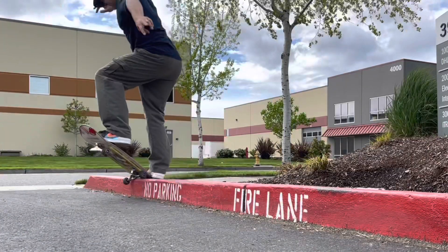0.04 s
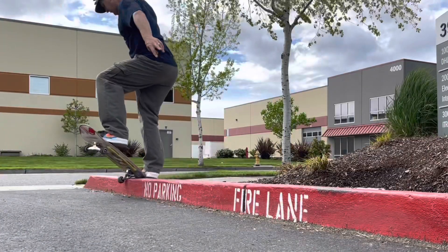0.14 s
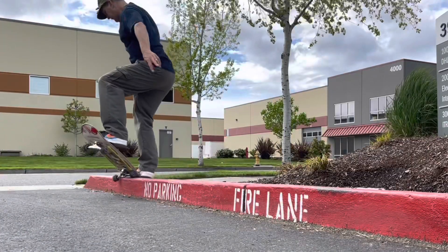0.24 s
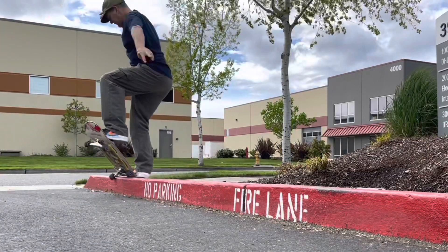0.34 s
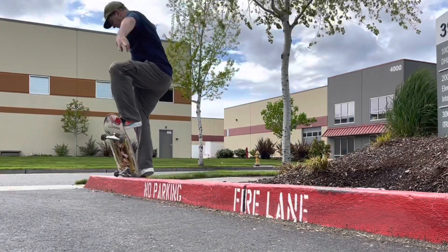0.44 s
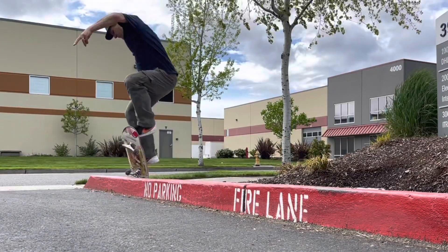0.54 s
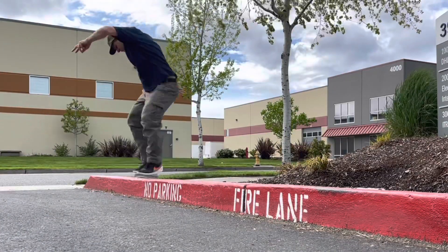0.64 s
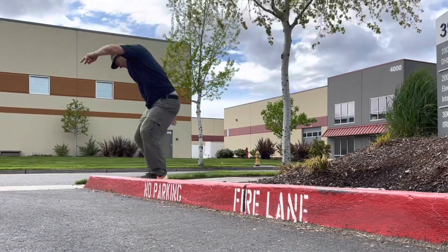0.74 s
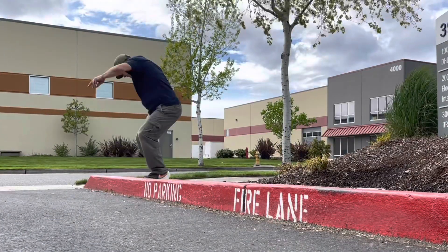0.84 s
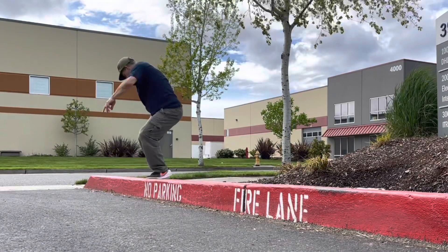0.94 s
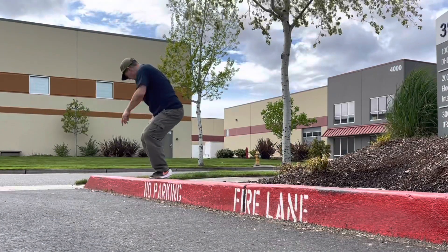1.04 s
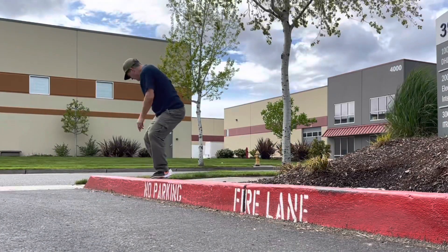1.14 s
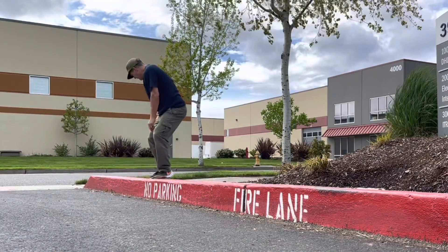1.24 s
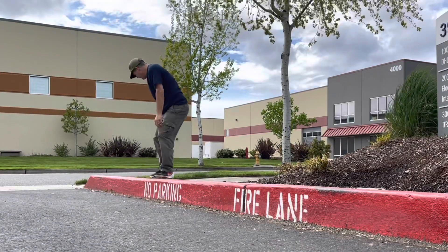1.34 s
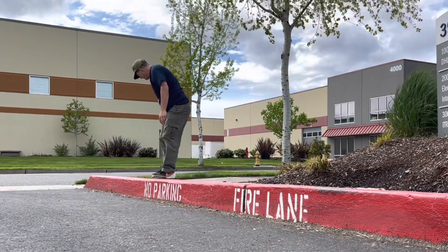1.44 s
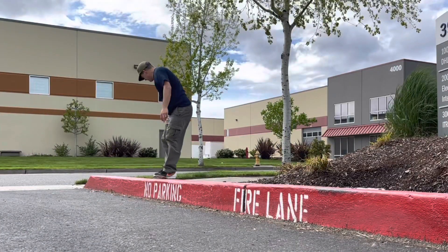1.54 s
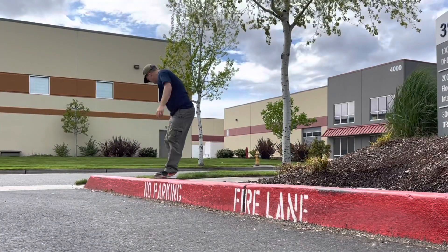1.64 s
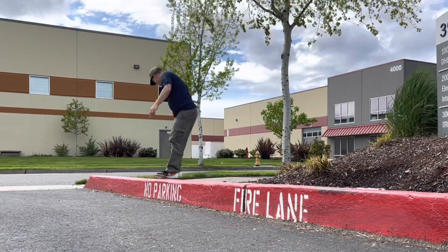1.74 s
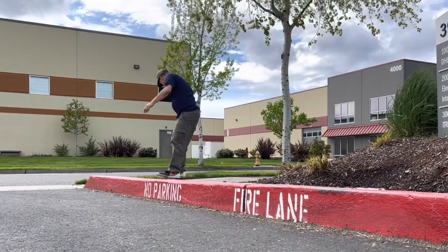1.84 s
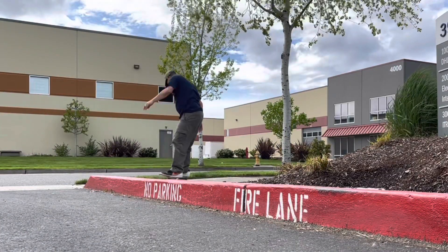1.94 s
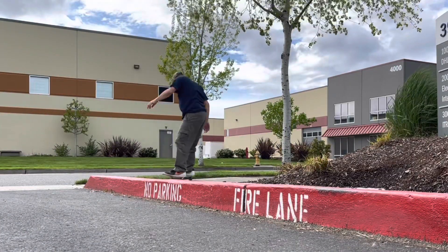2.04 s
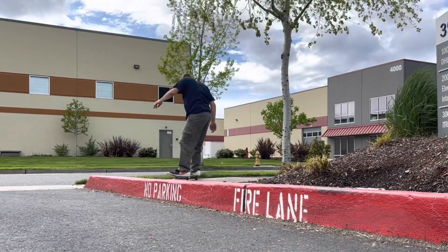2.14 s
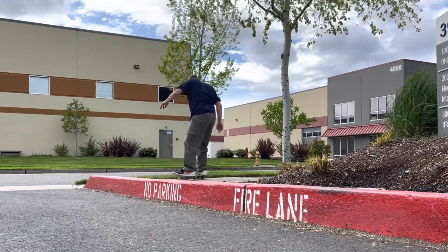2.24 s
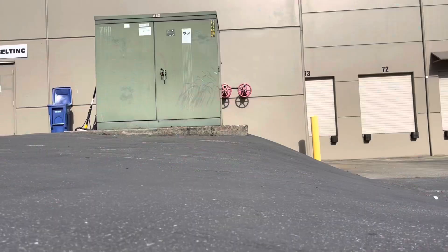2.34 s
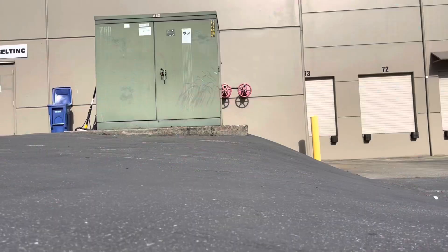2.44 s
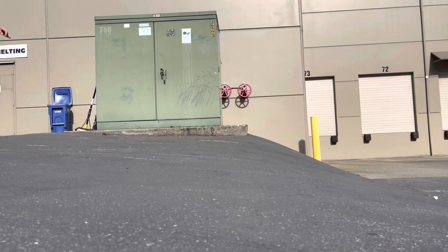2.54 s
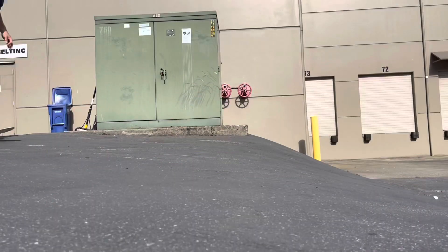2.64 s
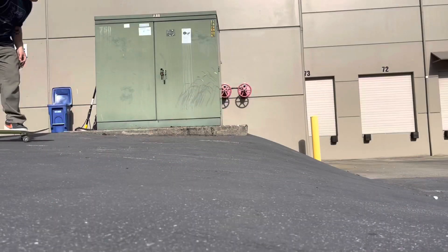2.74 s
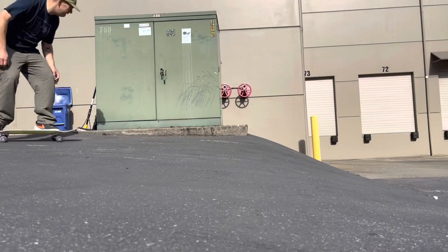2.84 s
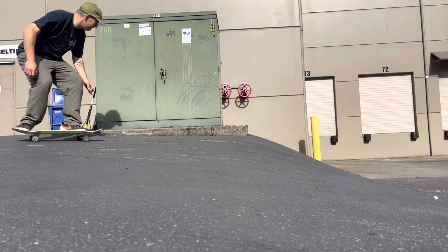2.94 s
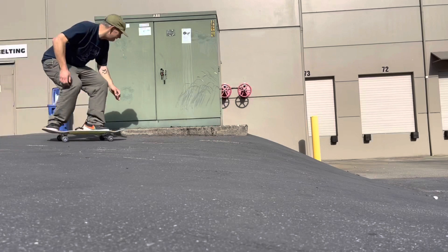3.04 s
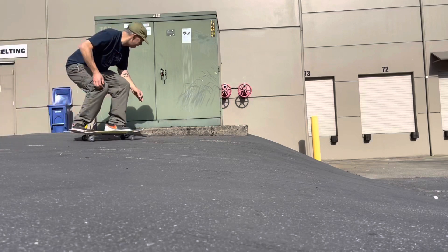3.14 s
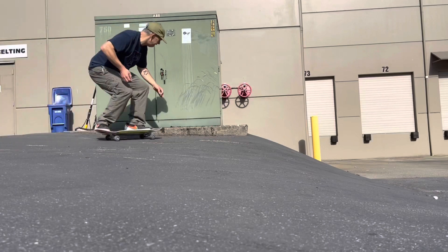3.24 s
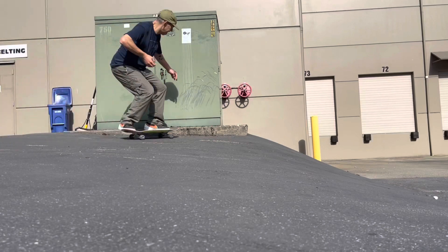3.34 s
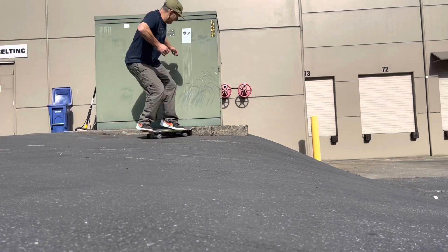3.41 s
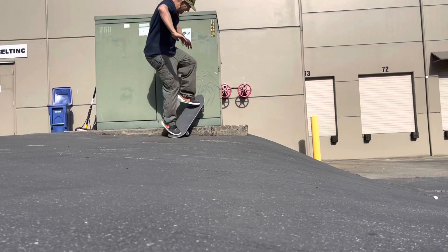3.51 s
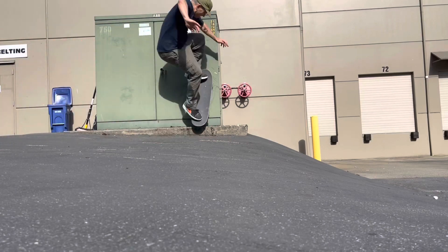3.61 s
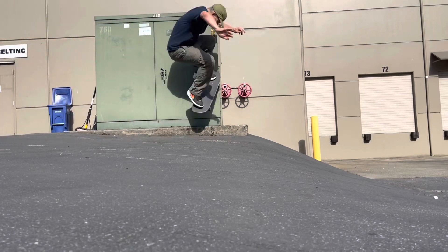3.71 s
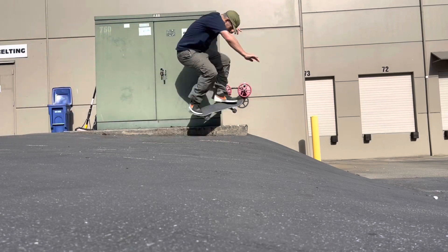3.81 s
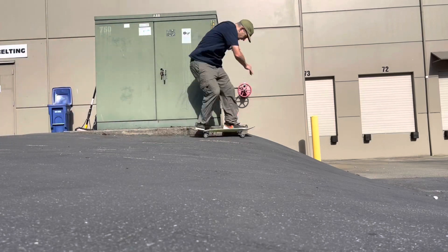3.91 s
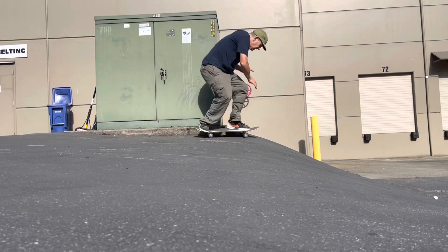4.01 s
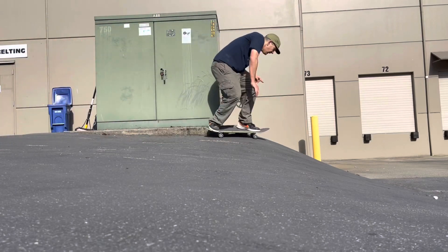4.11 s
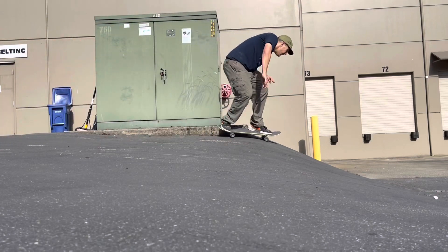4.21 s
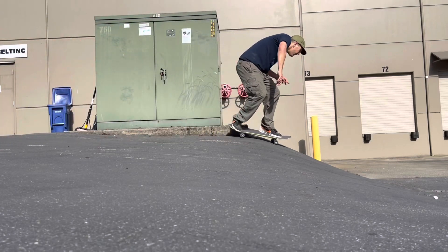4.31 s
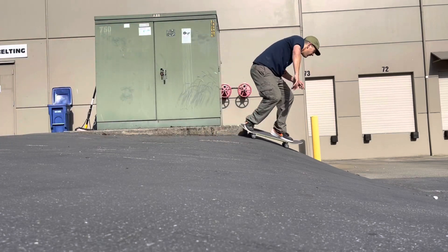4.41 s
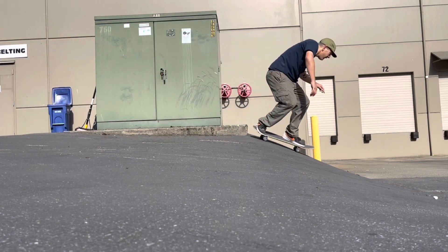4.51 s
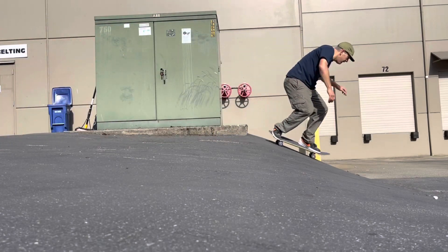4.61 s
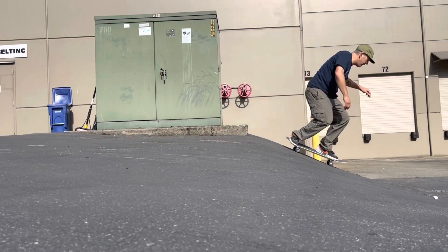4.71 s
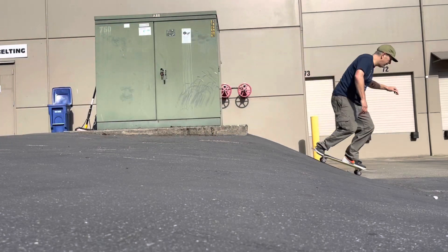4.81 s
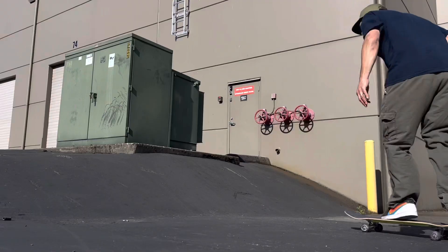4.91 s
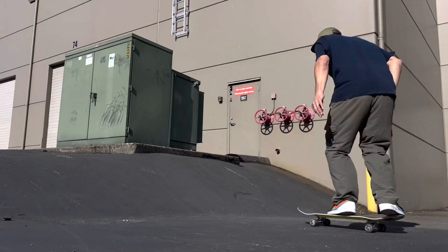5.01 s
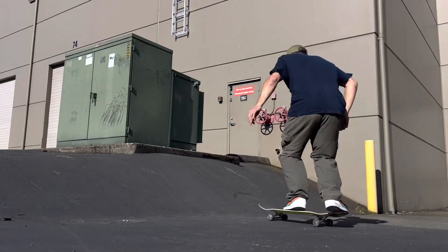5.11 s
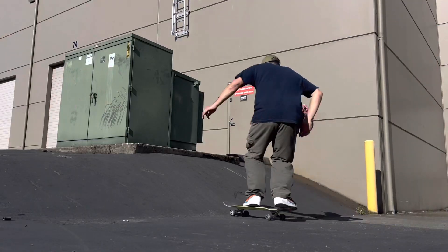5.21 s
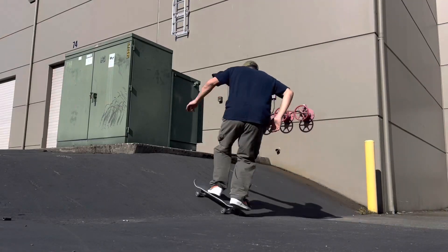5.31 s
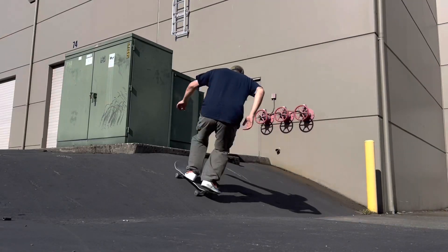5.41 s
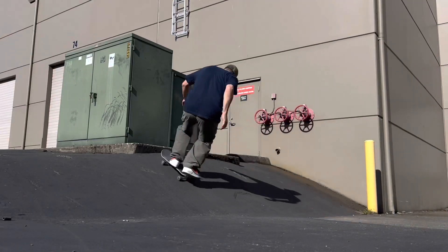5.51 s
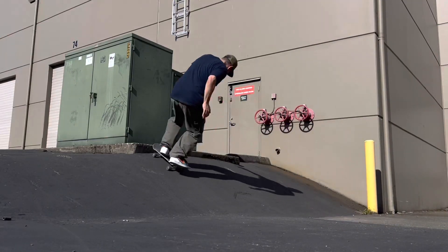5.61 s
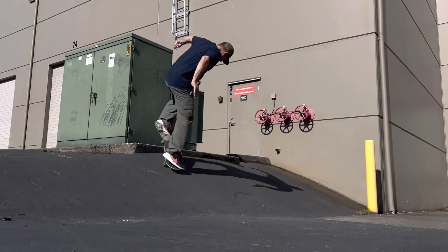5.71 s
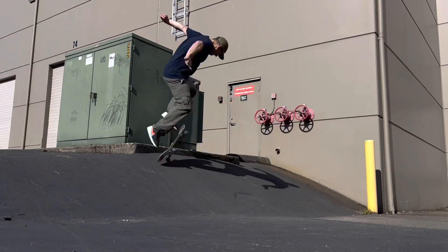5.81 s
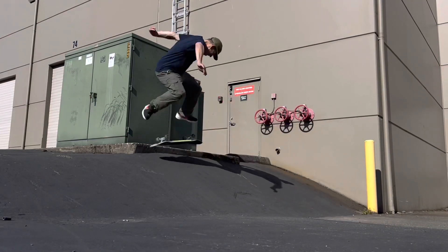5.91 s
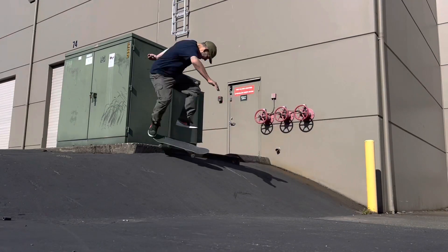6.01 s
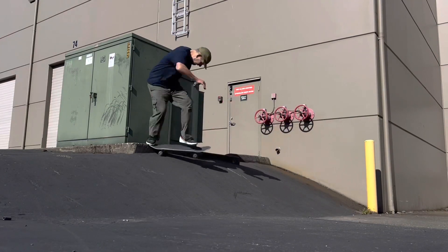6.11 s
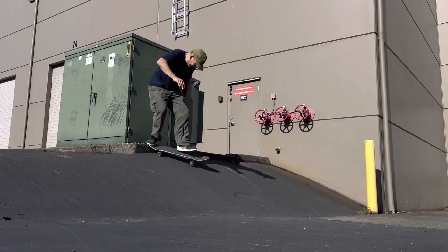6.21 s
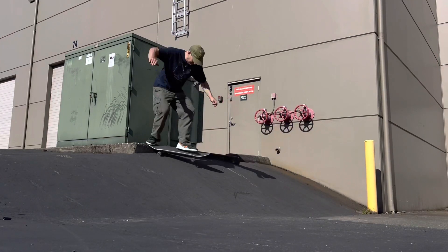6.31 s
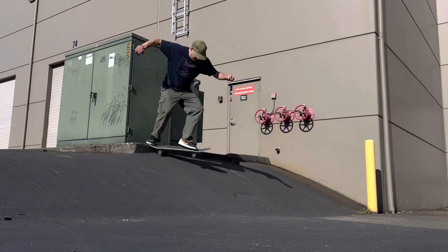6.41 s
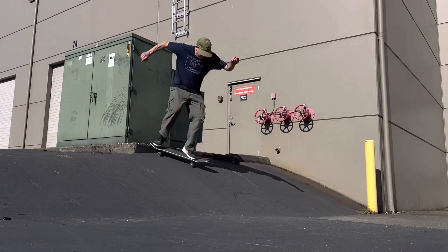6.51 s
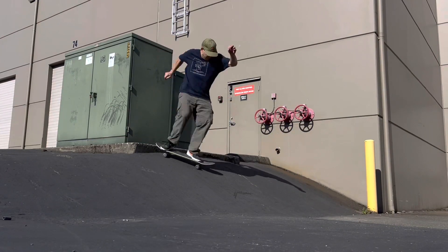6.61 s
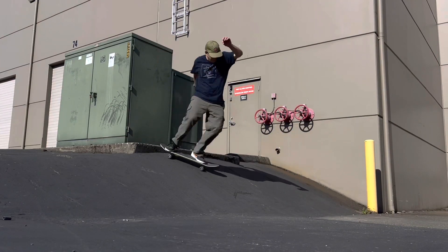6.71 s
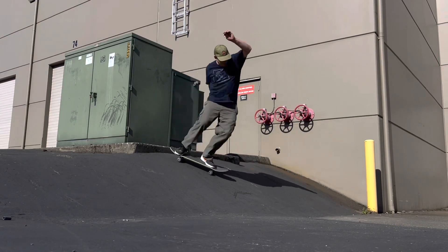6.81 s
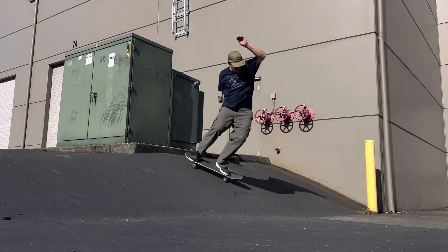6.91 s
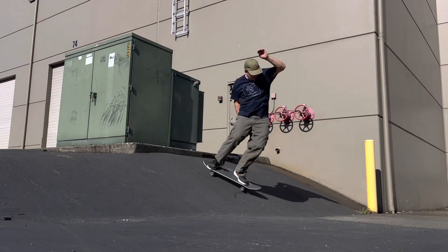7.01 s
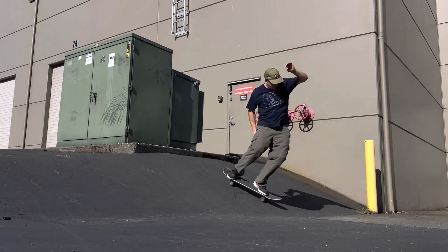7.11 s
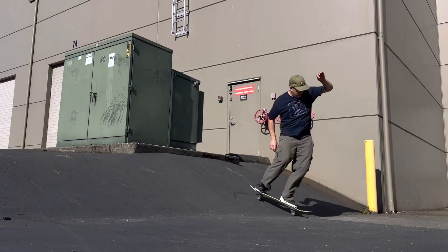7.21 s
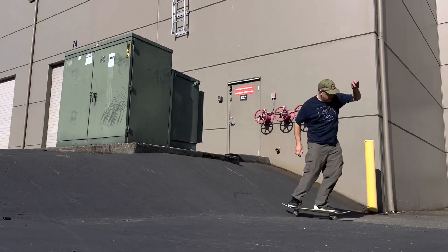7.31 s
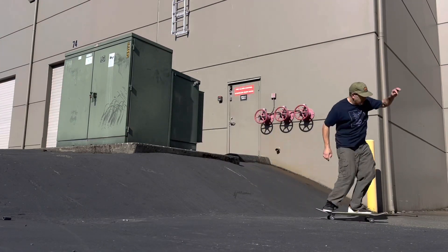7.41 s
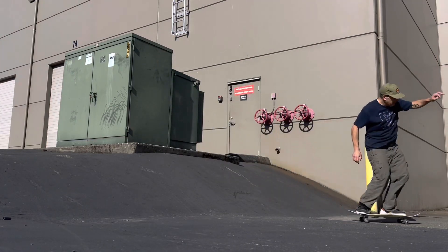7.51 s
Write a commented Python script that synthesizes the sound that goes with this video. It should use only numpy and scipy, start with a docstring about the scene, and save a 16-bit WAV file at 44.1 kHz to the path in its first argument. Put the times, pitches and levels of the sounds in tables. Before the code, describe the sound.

Hard wheels roar and whirr over rough ground, making the wooden deck drone. One solid knock gives way to a quiet stretch of wind rumble and small scuffs. Then come rolling, clustered cracks and thumps, a loud landing, gritty scrubbing, another pop and slap, wind thuds and clattering wheels. Outdoors, close, fairly dry, with short reflections from nearby walls.

```python
"""A skateboarder does three tricks in an open concrete and asphalt lot, close to a two-port microphone.
From the start hard wheels rattle over coarse ground: impacts make the deck drone and the trucks whirr.
A first pop and landing follow, then shoes scuff on the resting board while wind rumbles and buffets the ports.
The wheels return, with a quick cluster of slams, scrubs and low thumps, then one more pop and landing;
pops and slaps are short noise contacts that ring the board. The hush of the lot lies under everything."""
import sys
import numpy as np
from scipy import signal
from scipy.fft import rfft, irfft, next_fast_len
from scipy.io import wavfile

SR = 44100
rng = np.random.default_rng(int(sys.argv[2]) if len(sys.argv) > 2 else 0)


def put_to_file(sound):
    """Save the sound as 16-bit audio at rate SR, in the file named by the first command-line argument."""
    columns = np.atleast_2d(sound).T  # one column per channel
    safe = np.clip(columns, -1, 1)
    whole_steps = np.round(safe * 32767)
    wavfile.write(sys.argv[1], SR, whole_steps.astype(np.int16))


N = 332955
TIME = np.arange(N) / SR

# ringing of deck and trucks: (frequency [Hz], level [dB], t60 [s])
BOARD_MODES = [(426, -6.5, 0.12), (774, -3.5, 0.023), (1079, -8.5, 0.061), (1570, -0.5, 0.035),
               (1874, 4, 0.019)]


def from_db(db):
    """Decibels to gain."""
    return 10 ** (np.asarray(db) / 20)


def rms_one(x):
    """Scale to unit power."""
    return x / np.sqrt(np.mean(x ** 2) + 1e-20)


def in_time(rows):
    """Each column of a curve table, sample by sample."""
    s, *columns = np.transpose(rows)
    return [np.interp(TIME, s, column) for column in columns]


def band(x, low_hz, high_hz, order=3):
    """Butterworth band-pass."""
    edges_hz = [low_hz, min(high_hz, .45 * SR)]
    return signal.sosfilt(signal.butter(order, edges_hz, "band", fs=SR, output="sos"), x)


def colour(x, spectrum):
    """Causal (minimum-phase) filter with the given spectrum."""
    size = 8192
    hz, db = np.transpose(spectrum)
    grid_hz = np.linspace(1, SR / 2, size // 2 + 1)
    gain = from_db(np.interp(np.log(grid_hz), np.log(hz), db))
    cepstrum = irfft(np.log(gain))
    # doubling the causal half of the cepstrum gives minimum phase
    response = irfft(np.exp(rfft(2 * cepstrum[:size // 2], size) - cepstrum[0]))
    return signal.fftconvolve(x, response)[:len(x)]


def drift(rate_hz):
    """Slow chance with spread 1: low-passed noise."""
    slow = signal.butter(2, rate_hz, fs=SR, output="sos")
    return rms_one(signal.sosfilt(slow, rng.standard_normal(N)))


def swell(s, rise_s, fall_s):
    """A smooth rise to 1 at time s and a fall back towards 0; it is down to 1/e at either given time."""
    away = np.maximum((s - TIME) / rise_s, (TIME - s) / fall_s)
    return np.exp(-np.minimum(away, 10) ** 1.68)   # exponent 1 is a pointed swell, 2 a round one


def power(levels_db, envelope):
    """Power of several layers that share one envelope."""
    return np.outer(from_db(levels_db) ** 2, envelope ** 2)


def wheel_gains(scrub_db):
    """Gains of roar, whirr, grit and thrum: stretches of wheel noise, with scrubs and scuffs added in power."""
    # stretches of wheel noise, on the ground or spinning on in the air, growing or fading:
    # (start [s], end [s], roar at start [dB], roar at end [dB], whirr against roar [dB],
    # grit against roar [dB], low thrum [dB])
    stretches = [(-0.05, 0.437, -28, -37, -8.5, -15.5, -45), (2.402, 3.525, -38, -28.5, -11, -14, -29.5),
                 (3.62, 3.906, -27.5, -26.5, -11.5, -19.5, -26.5),
                 (4.058, 4.934, -31.5, -37, -10.5, -18, -34.5),
                 (4.965, 5.666, -23.5, -26.5, -9.5, -18.5, -33), (5.735, 6.002, -33.5, -50, -7.5, -18, -59),
                 (6.17, 6.833, -31.5, -37, -4, -19, -55), (6.868, 7.598, -31, -27.5, -8.5, -17, -38)]
    # wheels and tail bite harder into the ground and scrub, levels before scrub_db is added:
    # (time [s], rise [s], fall [s], roar [dB], whirr [dB], grit [dB])
    scrubs = [(0.255, 0.033, 0.065, -23, -35, -39.5), (0.51, 0.056, 0.028, -26.5, -34, -36),
              (2.7, 0.3, 0.29, -27, -42, -40.5), (3.515, 0.057, 0.053, -16.5, -26, -34),
              (3.571, 0.032, 0.11, -17, -23, -34.5), (4.19, 0.049, 0.077, -28, -38.5, -43.5),
              (4.893, 0.045, 0.13, -21.5, -27.5, -52), (5.076, 0.16, 0.085, -22, -27, -29.5),
              (5.359, 0.14, 0.11, -17, -26, -28.5), (5.687, 0.027, 0.012, -43, -27.5, -40.5),
              (5.778, 0.027, 0.045, -29.5, -38, -40), (6.472, 0.12, 0.068, -21.5, -36.5, -71),
              (7.27, 0.26, 0.24, -52, -29, -36.5)]
    # shoes scuff on the board at rest: (time [s], level before colouring [dB])
    scuffs = [(0.82, -48.5), (0.889, -44), (1.092, -55), (1.254, -49), (2.21, -49)]
    # colouring of the scuffs: (roar [dB], whirr [dB], grit [dB])
    scuff_colour_db = (9, -3.5, -7.5)
    attack_s, release_s, scuff_half_s = 0.069, 0.017, 0.022
    total, thrum = 0, 0
    for start, end, start_db, end_db, whirr_db, grit_db, thrum_db in stretches:
        outside = np.maximum((start - TIME) / attack_s, (TIME - end) / release_s)
        turning = np.exp(-np.clip(outside, 0, 10) ** 2)
        roar_db = np.interp(TIME, [start, end], [start_db, end_db])
        total += power([0, whirr_db, grit_db], turning * from_db(roar_db))
        thrum += (from_db(thrum_db) * turning) ** 2
    for s, rise_s, fall_s, *levels_db in scrubs:
        total += power(levels_db, from_db(scrub_db) * swell(s, rise_s, fall_s))
    scuffing = sum(from_db(db) * swell(s, scuff_half_s, scuff_half_s) for s, db in scuffs)
    total += power(scuff_colour_db, scuffing)
    return np.sqrt(total), np.sqrt(thrum)


def pebbles(per_s, spread_db):
    """Wheels strike stones of many sizes at random moments."""
    sizes = from_db(spread_db * np.minimum(rng.exponential(1, N), np.pi)) * rng.choice([-1, 1], N)
    return rms_one(sizes * (rng.random(N) < per_s / SR))


def flex(x, depth, width_hz, rate_hz):
    """As the contact point shifts, each mode of the board comes forward and recedes at random."""
    modes = (drift(rate_hz) * band(x, hz - width_hz, hz + width_hz, order=1) for hz, _, _ in BOARD_MODES)
    return x + depth * sum(modes)


def wall_echo(x):
    """A near wall returns the sound; its delay wanders, so a comb of peaks slides through the wheel noise."""
    delay_s = 0.007 + 0.000387 * drift(1)
    return x + from_db(-15.5) * np.interp(TIME - delay_s, TIME, x)


def crunches(per_s, length_s, depth):
    """Now and then a loose stone is crushed under a wheel and the noise flares for a few ms."""
    stones = (rng.random(N) < per_s / SR) * rng.random(N)
    return 1 + depth * signal.fftconvolve(stones, np.hanning(int(length_s * SR)), "same")


def resonate(x, hz, width_hz, share):
    """Blend x into its own ringing at a gliding resonance, holding the power about even."""
    turn = np.exp(2j * np.pi * np.cumsum(hz) / SR)
    r = np.exp(-np.pi * width_hz / SR)
    # shift the resonance down to 0 Hz, low-pass, and shift back up
    ringing = rms_one((signal.lfilter([1 - r], [1, -r], x / turn) * turn).real)
    share = np.clip(share, 0, 1)
    overlap = 2 * np.mean(x * ringing) * share * (1 - share)
    return ((1 - share) * x + share * ringing) / np.sqrt((1 - share) ** 2 + share ** 2 + overlap)


def wheel_noise(gains):
    """One stream of random impacts shakes the deck, rattles the trucks and hisses at the wheels."""
    # resonance of the deck: (time [s], frequency [Hz], share of the roar [0-1])
    drone = [(.45, 853, 0.41), (2.4, 418, 0.58), (2.85, 472, 0.7), (3.5, 470, 0), (5.15, 455, 0.32),
             (5.385, 574, 1), (5.46, 553, 0.23)]
    # balance of sizzle above 7.5 kHz against hiss: (time [s], level [dB])
    sizzle_balance = [(0.5, -1), (0.85, -18), (3.42, 0), (3.65, -26), (5.05, 0.5), (6.4, -14), (7.25, -4.5)]
    # spectrum of the shaken board: (frequency [Hz], relative level per Hz [dB])
    roll_spectrum = [(500, 5.5), (950, 1.5), (1300, -7.5), (1850, -17.5), (2400, -19), (3200, -29),
                     (7000, -33.5), (9500, -19), (12300, -28), (13900, -51)]
    roar_gain, whirr_gain, grit_gain = gains
    deck_hz, deck_share = in_time(drone)
    sizzle_gain = from_db(in_time(sizzle_balance)[0])
    road = pebbles(per_s=4000, spread_db=4.5) * from_db(1.12 * drift(34.0))
    board = flex(colour(road, roll_spectrum), depth=0.66, width_hz=64, rate_hz=8.9)
    shaken = wall_echo(board)
    crunch = crunches(per_s=50, length_s=0.0089, depth=1.68)   # flares in whirr and grit, not in the roar
    roar = resonate(rms_one(band(shaken, 242, 1440)), deck_hz, 87, deck_share)
    rattling = rms_one(band(shaken, 1387, 3060) * np.sqrt(crunch))
    whirr = resonate(rattling, np.full(N, 1756), width_hz=370, share=0.29)   # resonance of the trucks
    hiss = rms_one(band(shaken, 2800, 7500))
    sizzle = rms_one(band(shaken, 7500, SR))
    grit = rms_one(crunch * (hiss + sizzle_gain * sizzle) / np.hypot(1, sizzle_gain))
    return roar * roar_gain + whirr * whirr_gain + grit * grit_gain


def off_axis(x):
    """With the board to the left, the treble around 3-5.5 kHz gains in the left port and fades in the right."""
    # how far the board is to the left of the microphone: (time [s], share [0-1])
    leftward = [(2.4, 0.44), (3.55, 0.34), (3.9, 0.12)]
    hz = np.fft.rfftfreq(N, 1 / SR)
    shaded = irfft(rfft(x) * np.interp(hz, [500, 3000, 5500, 8000], [0, 1, 1, 0]), N)
    return x + in_time(leftward)[0] * shaded * np.array([[1], [-1]])


def rumble_gains():
    """Gains of deep and upper rumble: swells over a steady breeze, and the swell part the ports do not share."""
    # swells of low noise: wind gusts, and low thumps that both ports share:
    # (time [s], half length [s], deep [dB], upper [dB], port difference against the swell [dB])
    low_swells = [(0.47, 0.046, -25, -31, -14), (1.163, 1, -32.5, -47, -7),
                  (1.843, 0.16, -20.5, -32, -11.5), (2.17, 0.076, -36.5, -23, -12.5),
                  (3.605, 0.086, -21, -20, -50), (4.25, 0.46, -29, -33.5, -26),
                  (5.05, 0.14, -19.5, -19.5, -14), (5.51, 0.38, -27, -27.5, -2),
                  (6.443, 0.18, -25.5, -24.5, -5.5), (6.933, 0.13, -23.5, -21, -5),
                  (7.495, 0.13, -31, -28.5, -2.5)]
    # breeze between swells: (deep [dB], upper [dB])
    breeze_db = (-40.5, -43.5)
    shared, apart = power(breeze_db, np.ones(N)), 0
    for s, half_s, deep_db, upper_db, apart_db in low_swells:
        low_swell = power([deep_db, upper_db], swell(s, half_s, half_s))
        shared = shared + low_swell
        apart = apart + low_swell * from_db(apart_db) ** 2
    return np.sqrt(shared), np.sqrt(apart)


def rumble(gains):
    """Lumpy, fluttering low noise in two bands, for wind on the ports, low thumps and the thrum of the wheels."""
    # spectrum of the rumble: (frequency [Hz], relative level per Hz [dB])
    rumble_spectrum = [(25, -25.5), (58, 6), (130, 1), (350, -8.5)]
    deep_gain, upper_gain = gains
    flutter = from_db(2.4 * drift(18.0))
    low_noise = colour(rng.standard_normal(N), rumble_spectrum) * flutter
    deep = rms_one(band(low_noise, 24, 120)) * deep_gain
    upper = rms_one(band(low_noise, 122.5, 299)) * upper_gain
    return deep + upper


def air():
    """Far, even hush of the open lot, partly shared by the ports."""
    # spectrum of the hush: (frequency [Hz], relative level per Hz [dB])
    air_spectrum = [(650, 1.5), (1800, -12.5), (2500, -23.5), (9300, -30.5), (11000, -42)]
    shared, left, right = (band(colour(rng.standard_normal(N), air_spectrum), 200, SR / 2, order=2)
                           for _ in range(3))
    return from_db(-49) * rms_one(shared + .5 * np.array([left, right]))


def contacts():
    """Every blow as (s, knock dB, centre Hz, crack dB, sizzle dB, contact s); rattles are uneven runs."""
    # pops and landings: (time [s], knock [dB], knock centre [Hz], crack [dB],
    # sizzle against crack [dB], contact [s])
    slams = [(0.6975, -7.5, 630, -31, -5, 0.019), (3.505, -15.5, 1030, -38, 8, 0.026),
             (3.532, -11.5, 1250, -17, -25, 0.0098), (3.9075, -5.5, 590, -16.5, -1, 0.0066),
             (6.0758, -8.5, 1780, -18.5, -3.5, 0.0043), (6.544, -8, 1150, -21, 19, 0.0065)]
    # single knocks of wheels and deck: (time [s], knock [dB], knock centre [Hz], crack [dB])
    knocks = [(0.26, -19.5, 680, -38), (0.523, -21.5, 890, -53), (0.709, -9.5, 227, -27),
              (0.7225, -11.5, 810, -29), (0.874, -47, 585, -61), (1.847, -42.5, 1190, -52),
              (2.905, -31, 900, -36), (2.987, -25.5, 650, -36), (3.455, -18, 900, -22.5),
              (3.4896, -12.5, 890, -20), (3.5536, -7, 514, -30), (3.5641, -11, 840, -25),
              (3.729, -17, 710, -27.5), (3.94, -19, 780, -38), (4.499, -28.5, 1120, -35.5),
              (5.586, -15, 393, -57), (5.77, -23, 676, -48), (6.046, -22.5, 790, -33.5),
              (6.0751, -12.5, 630, -31), (6.099, -15.5, 447, -38), (6.168, -18.5, 884, -27.5),
              (6.226, -29.5, 1436, -34), (6.29, -14, 267, -34.5), (6.507, -19.5, 1510, -31),
              (6.569, -16, 1150, -36), (7.072, -12, 1270, -21), (7.208, -12.5, 1810, -29)]
    # the board judders in quick knocks, levels before their scatter:
    # (start [s], end [s], knock [dB], knock centre [Hz], crack [dB])
    rattles = [(3.568, 3.645, -27, 900, -28), (6.39, 6.5, -19, 530, -60), (6.956, 7.4, -26.5, 1680, -35)]
    knock_sizzle_db, knock_contact_s = -6.5, 0.0065
    shortest_gap_s, rattle_contact_s, scatter_db = 0.0069, 0.0025, 3
    rows = slams + [(*knock, knock_sizzle_db, knock_contact_s) for knock in knocks]
    for s, end, knock_db, hz, crack_db in rattles:
        while s < end:
            force_db = scatter_db * rng.standard_normal()
            rows.append((s, knock_db + force_db, hz, crack_db + force_db, knock_sizzle_db, rattle_contact_s))
            s += shortest_gap_s * (1 + rng.exponential())
    return rows


def blows(spread, overtones, attack_s, body_db, rattle_db, tail_s, reach_octaves):
    """Wood and wheels chatter on concrete: knock and bright crack, a rattling tail, modes ringing near its pitch."""
    # spectrum of the crack: (frequency [Hz], relative level per Hz [dB])
    crack_spectrum = [(3300, 7), (7000, -7.5), (9200, -1), (14000, -29)]
    out, t = np.zeros(N + SR), TIME[:SR // 4]
    mode_hz, mode_db, t60 = np.transpose(BOARD_MODES)[:, :, None]
    modes = from_db(mode_db - 60 * t / t60) * np.sin(2 * np.pi * mode_hz * t)
    tail = np.exp(-(t / tail_s) ** 2)
    for s, db, hz, crack_db, sizzle_db, contact_s in contacts():
        contact = np.exp(-(t / contact_s) ** 4)

        def level(v):
            """Scale to the energy of the contact envelope."""
            return v * np.linalg.norm(contact) / np.linalg.norm(v)

        chatter = rng.standard_normal(len(t)) * np.tanh(t / attack_s)
        body = chatter * (contact + from_db(body_db) * tail)
        knock = band(body, hz / (1 + spread), hz * (1 + spread), order=1)
        knock = band(knock, 150, min(overtones * hz, 2200), order=4)   # lower knocks reach less high
        snap = colour(chatter * (contact + from_db(rattle_db) * tail), crack_spectrum)
        sizzle = level(band(snap, 7600, SR))
        crack = level(band(snap, 1420, 6440, order=2)) + from_db(sizzle_db) * sizzle
        nearness = np.exp(-np.abs(np.log2(mode_hz / hz)) / reach_octaves)
        ringing = sum(nearness * rng.choice([-1, 1], mode_hz.shape) * modes)
        at = round(s * SR)
        out[at:at + len(t)] += from_db(db) * (level(knock) + ringing) + from_db(crack_db) * level(crack)
    return out[:N]


def lot(x, wet_db, t60):
    """Ground and walls scatter a short wash that differs from left to right."""
    t = TIME[:SR // 4]
    scatter = rng.standard_normal((2, len(t))) * from_db(-60 * t / t60)
    scatter /= np.sqrt(np.sum(scatter ** 2, axis=1, keepdims=True))
    wet = signal.fftconvolve(x[None], scatter, axes=1)[:, :N]
    return (x + from_db(wet_db) * wet) / np.sqrt(1 + from_db(2 * wet_db))


def buffets(length_s):
    """An eddy hits the microphone with a short dull flutter of decaying noise."""
    # wind buffets on the microphone: (time [s], peak [dB], centre [Hz])
    eddies = [(0.959, -21, 104), (1.691, -14.5, 143), (1.795, -16, 220), (2.127, -13, 210),
              (2.173, -19, 264), (6.923, -2.5, 302), (7.048, -14, 160)]
    out, t = np.zeros(N + SR), TIME[:SR // 5]
    for s, db, hz in eddies:
        burst = rng.standard_normal(len(t)) * np.exp(-(t / length_s) ** 2)
        eddy = band(burst, hz * .6, hz * 1.7)
        at = round(s * SR)
        out[at:at + len(t)] += from_db(db) * eddy / np.abs(eddy).max()
    return out[:N]


def scene():
    """Direct sound is mostly shared by both ports, but while the board is to the left its 3-5.5 kHz band leans
    into the left port; scattered sound and part of the low swells set the ports further apart."""
    # scattered sound against direct sound: (frequency [Hz], level [dB])
    scatter_spectrum = [(100, -17), (1000, -3), (4000, -4.5), (9000, -9)]
    # the level dips briefly, all but the blows: (time [s], half length [s])
    dip_times = [(2.371, 0.028), (4.945, 0.012)]
    wheels, thrum = wheel_gains(scrub_db=-0.5)
    far_wheels, _ = wheel_gains(scrub_db=-5.5)   # scrubs arrive more directly than the other wheel noise
    (deep, upper), (deep_apart, upper_apart) = rumble_gains()
    direct = off_axis(wheel_noise(wheels))
    direct = direct + rumble((deep, np.hypot(upper, thrum))) + buffets(length_s=0.014)
    scattered = colour(wheel_noise(far_wheels), scatter_spectrum)
    scattered += rumble((deep_apart, upper_apart + from_db(-19.5) * thrum))
    hits = blows(spread=0.36, overtones=2.5, attack_s=0.00037, body_db=-14, rattle_db=-8.5,
                 tail_s=0.034, reach_octaves=0.96)
    dips = from_db(-25 * sum(swell(s, half_s, half_s) for s, half_s in dip_times))
    bed = direct + scattered * np.array([[1], [-1]]) + air()
    return dips * bed + off_axis(lot(hits, wet_db=-16, t60=0.1))


def record(dry):
    """The two ports fall out of step in the high treble; peaks are rounded and the top is cut."""
    size = next_fast_len(N + 1000)
    hz = np.fft.rfftfreq(size, 1 / SR)
    left_lead = np.interp(hz, [0, 3500, 8500, 15600], [0, .6, 0, -4 * np.pi])   # phase [rad]
    turned = rfft(dry, size) * np.exp(1j * np.outer([.5, -.5], left_lead))
    ports = irfft(turned, size)[:, :N]
    rounded = ports / (1 + (ports / .95) ** 4) ** (1 / 4)
    top_cut = signal.ellip(10, .1, 80, 15900, fs=SR, output="sos")   # cutoff 15.9 kHz
    return signal.sosfilt(top_cut, rounded)


dry = scene()
out = record(dry)
put_to_file(out)
```